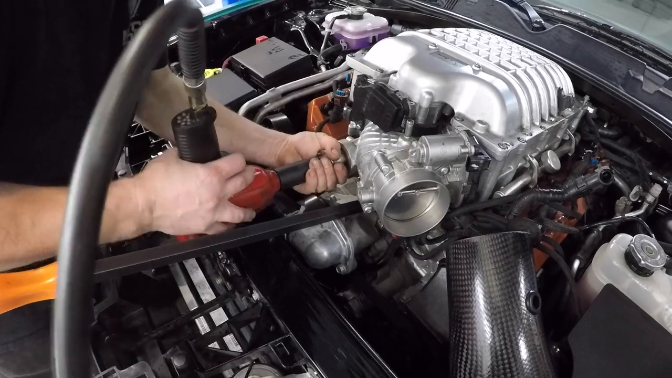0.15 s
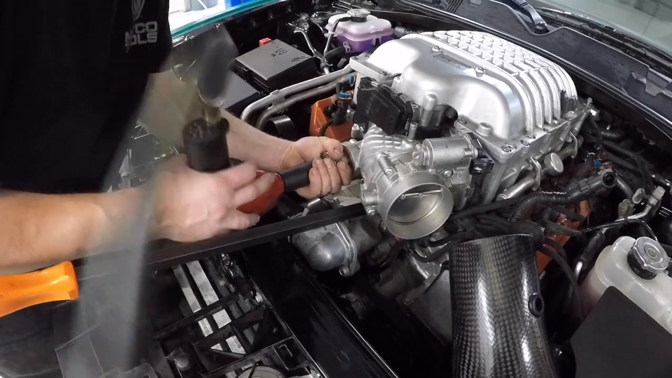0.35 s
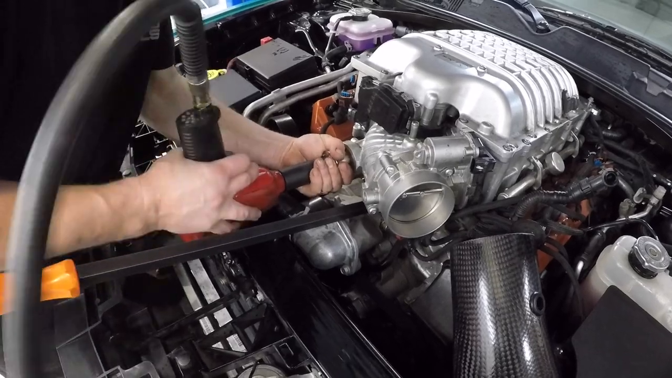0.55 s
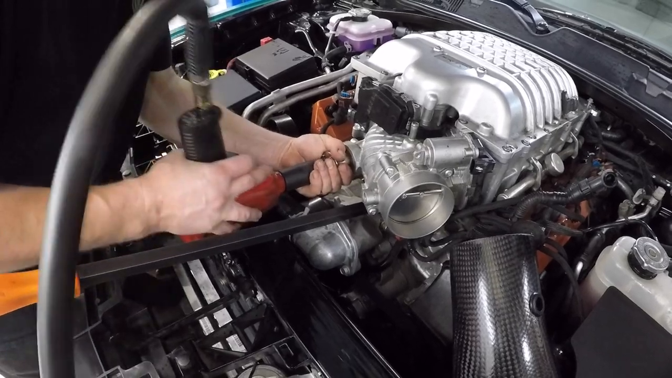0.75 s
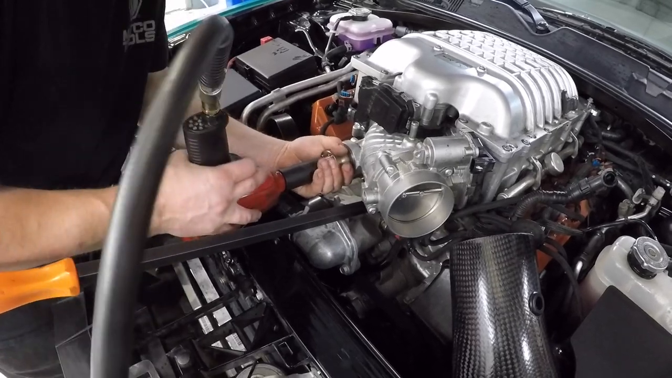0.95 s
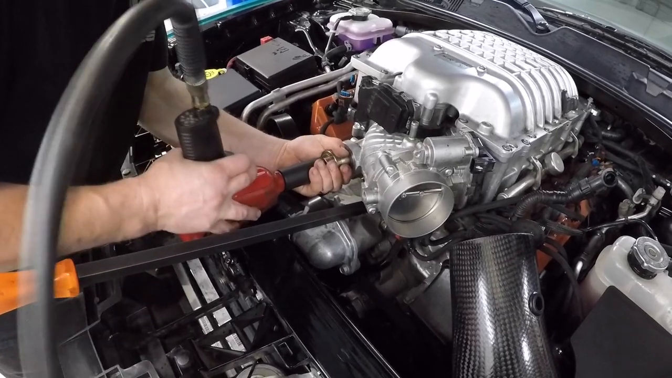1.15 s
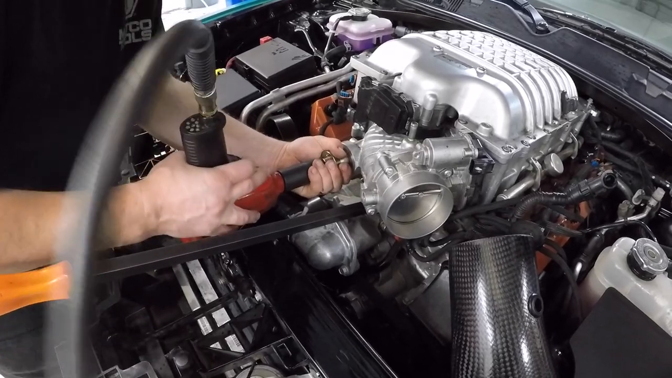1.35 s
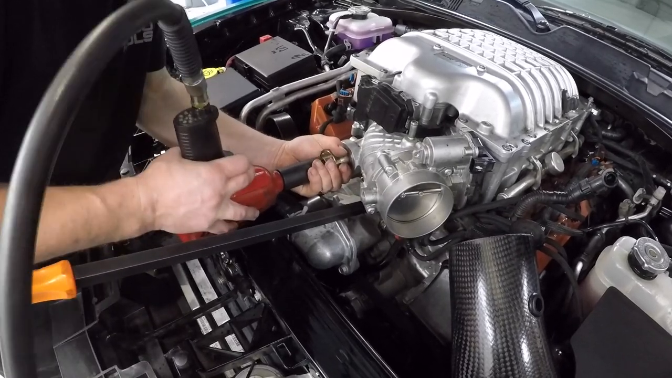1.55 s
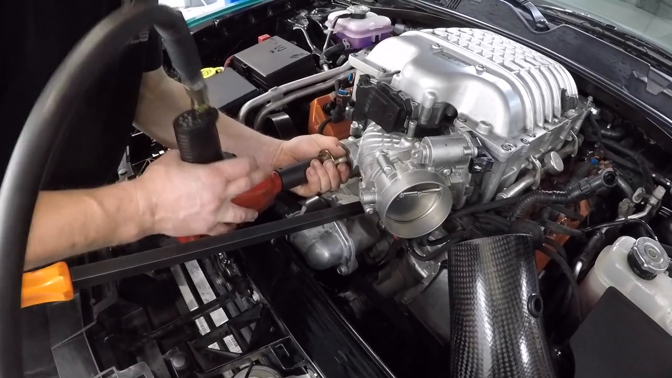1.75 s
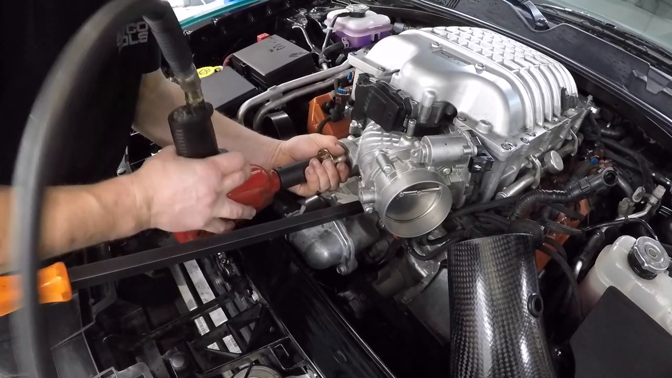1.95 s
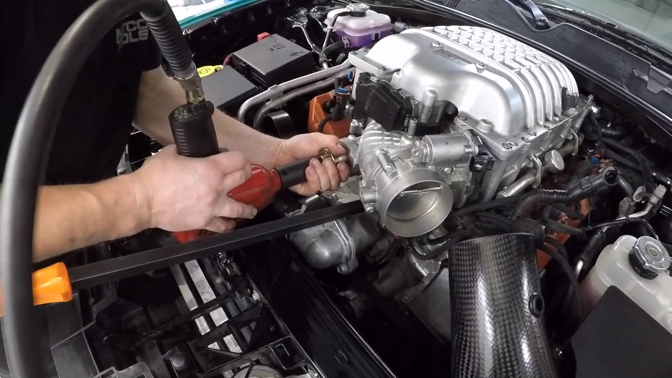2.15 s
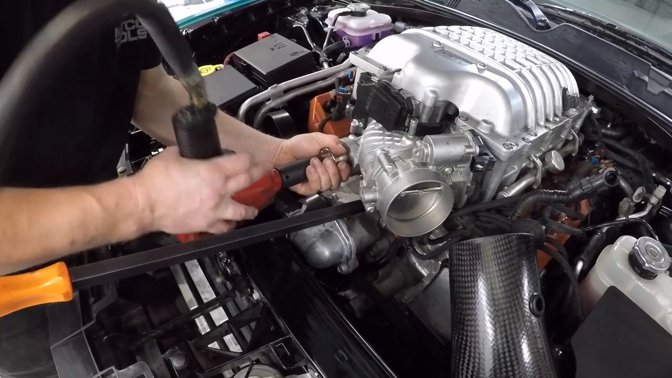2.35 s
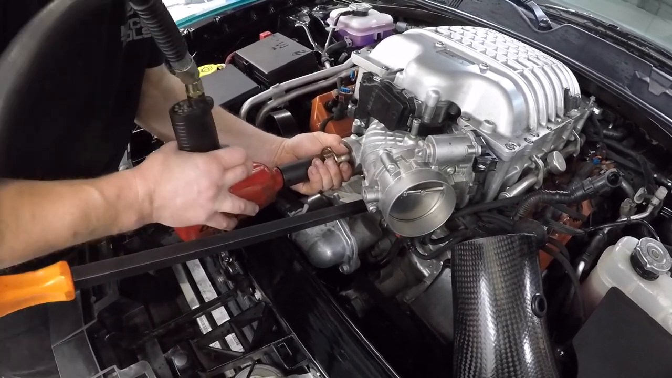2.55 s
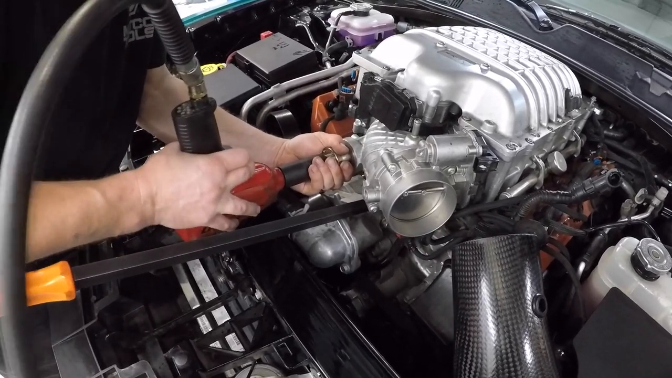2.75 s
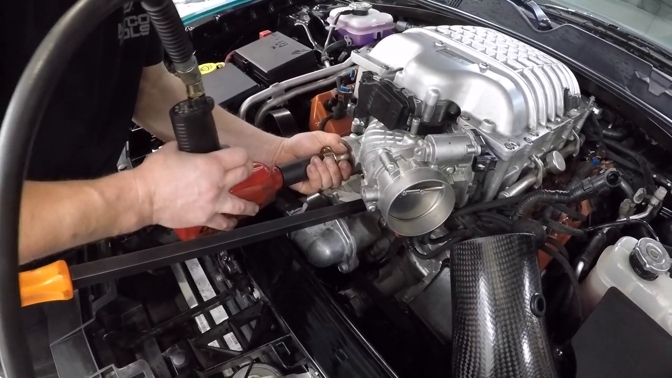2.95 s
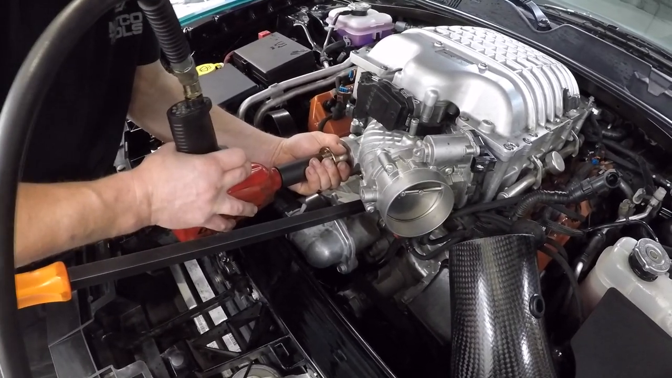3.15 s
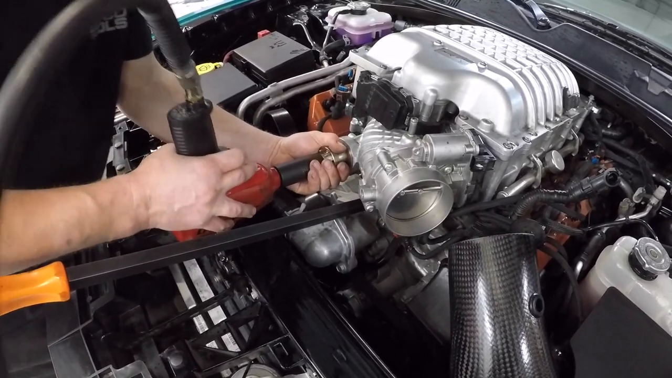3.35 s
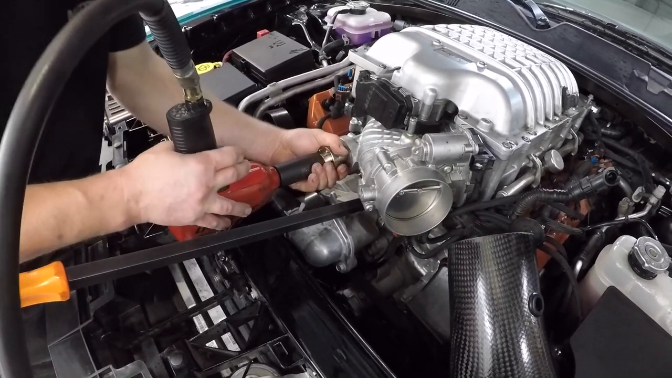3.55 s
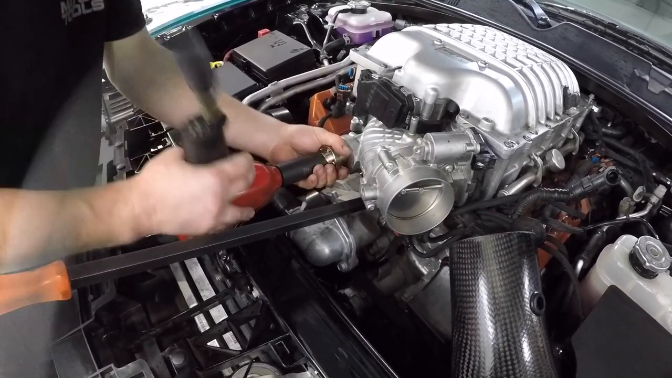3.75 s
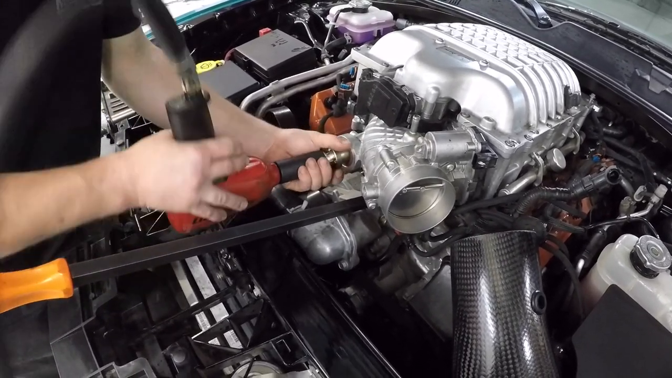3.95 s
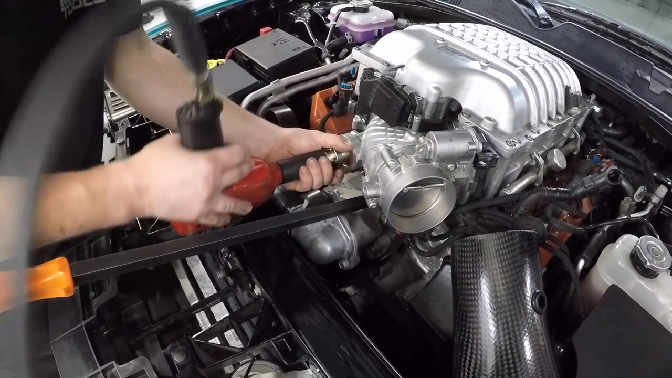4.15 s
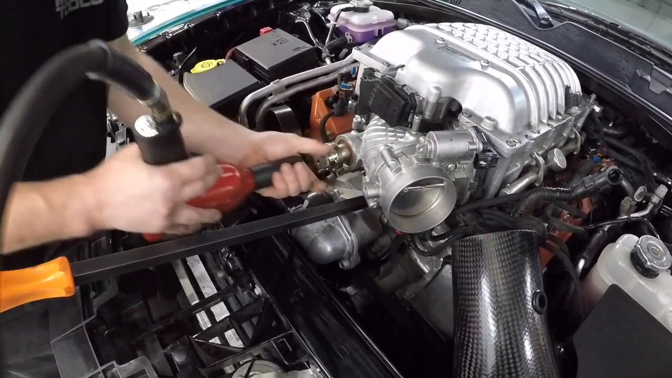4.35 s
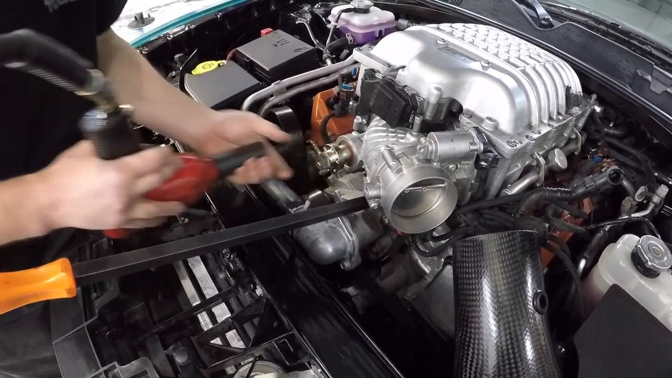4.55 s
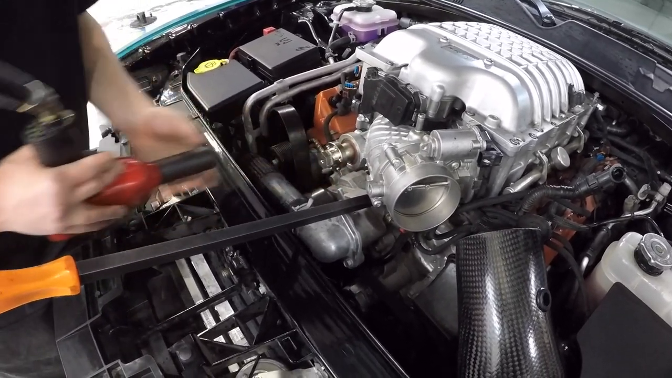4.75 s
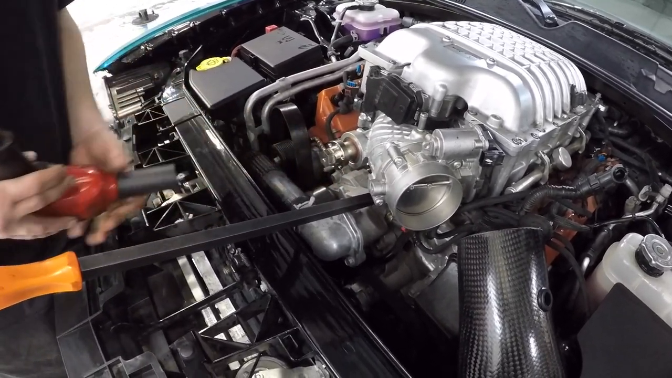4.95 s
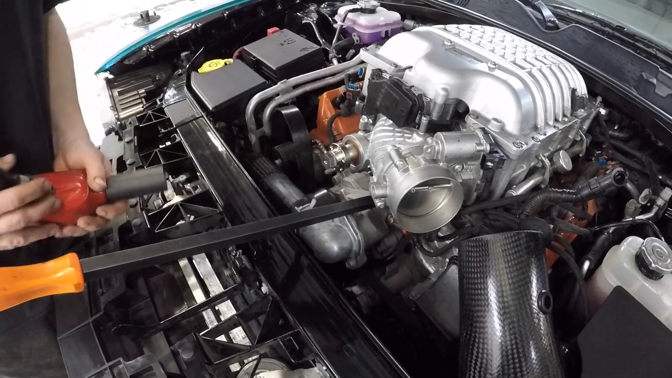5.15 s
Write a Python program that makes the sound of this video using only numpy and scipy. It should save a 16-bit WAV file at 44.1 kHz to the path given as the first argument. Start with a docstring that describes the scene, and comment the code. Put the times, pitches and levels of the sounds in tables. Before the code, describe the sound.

A nearby stereo microphone catches a pneumatic wrench tightening a bolt: loud buzzing rattles of about twenty blows a second, bright steel clank and breathy air exhaust. Five short bursts and one longer one echo in a large hard-walled garage. Afterwards the tail fades, ventilation drone and a thin steady tone rise, with soft thuds and ticks as the tool is moved away.

```python
"""Impact wrench in a garage

An air impact wrench hammers a bolt in six bursts inside an engine bay, in a large echoing garage.
Vane pulses, exhaust pops and jet noise make the motor; each blow rings the modes of anvil, socket and bolt
and shakes loose parts. Decaying noise makes the echo, and noise and wavering tones make the shop.
When the tool stops, the echo dies and the recorder's gain control slowly lifts the hum of the shop,
with a few small knocks and clinks of handling."""
import sys
import numpy as np
from scipy import signal
from scipy.fft import rfft, irfft
from scipy.io import wavfile
from scipy.ndimage import uniform_filter1d

SR = 44100
rng = np.random.default_rng(int(sys.argv[2]) if len(sys.argv) > 2 else 0)


def gain_from_decibels(decibels):
    """Convert decibel values to linear amplitude factors."""
    exponent = np.asarray(decibels, float) / 20
    return 10 ** exponent


def materialize(psi):
    """Save the field psi as 16-bit PCM at rate SR to the path in sys.argv[1].

    A 1-D psi becomes a single channel; in a 2-D psi each row is a channel.
    """
    bounded = np.clip(np.atleast_2d(psi).T, -1, 1)
    quanta = np.round(bounded * 32767).astype(np.int16)
    wavfile.write(sys.argv[1], SR, quanta)


N = 233730
TIME = np.arange(N) / SR   # seconds


def rms_one(x):
    """Scale to rms 1."""
    return x / np.sqrt(np.mean(x ** 2) + 1e-20)


def at_hz(points, hz, column=1):
    """Read a table on a log-frequency axis."""
    points = np.array(points)
    return np.interp(np.log(hz), np.log(points[:, 0]), points[:, column])


def band(x, low_hz, high_hz):
    """Keep the sound between two frequencies (Butterworth band-pass)."""
    edges = [low_hz, min(high_hz, .45 * SR)]
    return signal.sosfilt(signal.butter(2, edges, "band", fs=SR, output="sos"), x)


def clicks(times, sizes):
    """Single-sample clicks of the given sizes at the given times in seconds."""
    out = np.full(N, 1e-18)
    places = np.clip((np.asarray(times) * SR).astype(int), 0, N - 1)
    np.add.at(out, places, sizes)
    return out


def dying(x, t60):
    """Every click leaves an exponential tail that falls 60 dB in t60 seconds."""
    return signal.lfilter([1], [1, -gain_from_decibels(-60 / (t60 * SR))], x)


def coloured(spectrum, likeness):
    """Stereo noise with a spectrum and a left-right likeness by frequency; rms 1."""
    hz = np.maximum(np.arange(N // 2 + 1) * SR / N, 1)
    alike = np.clip(at_hz(likeness, hz), -1, 1)
    mid, side = rfft(rng.standard_normal((2, N))) * gain_from_decibels(at_hz(spectrum, hz))
    left_right = np.sqrt(1 + alike) * mid + np.sqrt(1 - alike) * side * [[1], [-1]]
    return rms_one(irfft(left_right, N))


# Pulls of the trigger. Each row: valve opens in seconds, valve starts to shut in seconds,
# air pressure in dB, pop pitch in Hz before scatter.
TRIGGER = [(-.003, 0.196, 4, 152), (0.382, 0.692, 0, 160), (0.937, 1.225, 0, 139), (1.387, 1.681, -.5, 110),
           (1.86, 2.273, -0.5, 122), (2.418, 3.241, -1, 149.5)]


def burst_of(s):
    """Index of the trigger pull that each moment belongs to."""
    return np.maximum(np.searchsorted(np.array(TRIGGER)[:, 0], s) - 1, 0)


# Motor start before the first blow of a pull. Each row: lead before the blow in ms for the usual start time,
# gust of the jet in dB, width of the gust in ms, pop in dB before air pressure.
SPIN_UP = [(46, -30, 1.8, -35), (35.9, -17, 3.7, -18.5), (21.15, -20, 2.7, -14.5), (11.1, -18, 3.5, -15.5)]
SPIN_UP_S = .04   # usual start time; a slower start stretches the pattern
POP_PER_PRESSURE = 1.3   # dB of pop per dB of air pressure


def spin_up():
    """Rows (s, gust dB, width ms, pop dB, pop Hz) leading from each opening of the valve to the first blow."""
    s = np.array(BLOWS)[:, 0]
    rows = []
    for opens, _, pressure_db, hz in TRIGGER:
        first = s[s > opens][0]
        stretch = (first - opens) / SPIN_UP_S
        for ms, gust_db, width_ms, pop_db in SPIN_UP:
            at = first - ms / 1000 * stretch
            rows.append((at, gust_db, width_ms, pop_db + POP_PER_PRESSURE * pressure_db, hz))
    return rows


POWERED_GAP_S = .06   # blows closer than this follow under air
STALL_S, STALL_SCATTER_S = 0.0258, .002   # the motor stands still after a blow, then restarts with a pop
POP_DB, POP_SAG_DB_PER_S, POP_SCATTER_DB = -11.5, 6, 0.76
POP_PITCH_SCATTER = 0.1   # spread of the natural log of the pitch
VENT_S, VENT_DB, VENT_HZ = .012, -20.5, 178   # a faint pop after the last blow of a burst


def pop_events():
    """Rows (s, dB, Hz): restarts after blows, weaker as the air sags; venting at the end; spin-up pops."""
    s = np.array(BLOWS)[:, 0]
    opens, _, pressure_db, hz = np.array(TRIGGER)[burst_of(s)].T
    luck = rng.standard_normal((len(s), 3))
    close = np.diff(s) < POWERED_GAP_S
    followed = np.append(close, False)
    last = np.append(False, close) & ~followed
    at = s + STALL_S + STALL_SCATTER_S * luck[:, 0]
    db = POP_DB + POP_PER_PRESSURE * pressure_db - POP_SAG_DB_PER_S * (s - opens)
    db = db + POP_SCATTER_DB * luck[:, 1]
    restarts = np.transpose([at, db, hz * np.exp(POP_PITCH_SCATTER * luck[:, 2])])
    vents = [(blow + VENT_S, VENT_DB, VENT_HZ) for blow in s[last]]
    starts = [(start, start_db, pitch) for start, _, _, start_db, pitch in spin_up()]
    return [*restarts[followed], *vents, *starts]


def pops(turns_before=0.49, turns_after=0.67, puff_s=0.0033):
    """A small crest, a deep trough and a larger second crest of pressure; the first carries a puff of jet noise."""
    wave, puff = np.zeros(N), np.zeros(N)
    for s, db, hz in pop_events():
        near = slice(max(int((s - .025) * SR), 0), max(int((s + .025) * SR), 0))
        turn = (TIME[near] - s) * hz   # cycles from the trough
        fade = np.exp(-(turn / np.where(turn < 0, turns_before, turns_after)) ** 2)
        wave[near] -= gain_from_decibels(db) * np.cos(2 * np.pi * turn) * fade
        puff[near] += gain_from_decibels(db) * np.exp(-((turn + .5) / (hz * puff_s)) ** 2)
    return wave, puff


# Vane motor around each blow, speeding up to it and braked by it.
# Each row: time from the blow in ms, vane pulses in Hz, pulse level in dB.
SPIN = [(-21, 190, -13.5), (-15, 280, -1), (-8, 330, -2.5), (0, 370, -9.5), (8, 260, -8), (17, 200, -6)]
# Overtones of the vane pulses. Each row: multiple of the pulse rate, level in dB, phase in radians.
VANE_OVERTONES = [(1, 0, .0), (2, -10.5, 0.74), (3, -18.5, 0.21), (4, -16, 0.3)]
# Colour of the exhaust jet. Each row: frequency in Hz, relative level in dB per Hz.
HISS = [(260, 0), (450, -10), (790, -13), (1050, -8.5), (1980, -5), (2780, -14.5), (3580, -7), (4960, -7.5),
        (6660, -2), (10200, -22), (11200, -28), (12200, -26), (15500, -38)]
# How alike the tool's noise is in the two ears. Each row: frequency in Hz, likeness from -1 to 1.
LIKENESS = [(60, 1), (120, 0.92), (240, 0.98), (480, 0.58), (950, 0.28), (1890, -0.19), (3770, 0.84),
            (7520, -0.33), (15000, -0.14)]
# Low notes of the exhaust lean left. Each row: frequency in Hz, left over right in dB.
LEFT_DB = [(30, 6.5), (125, 2.6), (400, -.1)]
VANE_DB, HISS_DB = -21, -25
HISS_PER_PRESSURE = 0.24   # dB of hiss per dB of air pressure
GUST_LEAD_S = 0.0027   # the gust comes ahead of its pop


def air_motor(jet_depth=0.24, pop_jet_db=-12, rough=0.24, rumble_db=-36):
    """Vanes pulse the exhaust ever faster up to each blow; the jet hisses on each pulse."""
    marks = sorted((s + ms / 1000, hz, db) for s, *_ in BLOWS for ms, hz, db in SPIN)
    at, vane_hz, vane_db = np.transpose(marks)
    turn = 2 * np.pi * np.cumsum(np.interp(TIME, at, vane_hz)) / SR
    uneven = np.exp(rough * rms_one(band(rng.standard_normal(N), 30, 142)))
    flow, jet, size = np.zeros(N), np.zeros(N), np.zeros(N)
    for opens, shuts, pressure_db, _ in TRIGGER:
        opening = np.clip((TIME - opens) / 0.0056, 0, 1)
        valve = opening * np.exp(-np.maximum(TIME - shuts, 0) / 0.017)
        flow += valve
        size += gain_from_decibels(VANE_DB + pressure_db) * valve
        jet += gain_from_decibels(HISS_DB + HISS_PER_PRESSURE * pressure_db) * valve
    for s, db, ms, *_ in spin_up():
        jet += gain_from_decibels(db) * np.exp(-np.abs(TIME - s + GUST_LEAD_S) * 1000 / ms)
    size = size * uneven * gain_from_decibels(np.interp(TIME, at, vane_db))
    pulses = size * sum(gain_from_decibels(db) * np.cos(k * turn + lag) for k, db, lag in VANE_OVERTONES)
    rumble = flow * gain_from_decibels(rumble_db) * rms_one(band(rng.standard_normal(N), 58, 134))
    pop, puff = pops()
    hz = np.maximum(np.arange(N // 2 + 1) * SR / N, 1)
    lean = gain_from_decibels(at_hz(LEFT_DB, hz) * [[.5], [-.5]])
    low = irfft(rfft(pop + pulses + rumble) * lean, N)
    gate = jet * (1 + jet_depth * np.cos(turn)) + gain_from_decibels(pop_jet_db) * puff
    return low + gate * coloured(HISS, LIKENESS)


# Colour of ventilation and distant machines. Each row: frequency in Hz, relative level in dB per Hz.
SHOP = [(15, -42), (25, 1), (140, 2), (204, -10), (281, -15.5), (537, -7.5), (582, -22), (741, -11),
        (848, -8.5), (1530, -10), (5580, -17.5), (8350, -33.5), (13500, -49), (15500, -80)]
# How alike the shop's noise is in the two ears. Each row: frequency in Hz, likeness from -1 to 1.
SHOP_LIKENESS = [(60, 0.95), (180, 0.4), (550, -0.69), (1650, -0.088), (4970, 0.21), (15000, -0.79)]
# The shop's noise swells. Each row: time in seconds, change of level in dB.
RUMBLE = [(0, -3), (3.8, -1.5), (4.4, 1.5), (4.8, 3.5), (5.3, 4.5)]
# Steady tones of shop machines. Each row: start in seconds, stop in seconds, pitch in Hz,
# width of the line in Hz, rms level in dB.
TONES = [(0, 3.9, 587.5, 1, -60), (3.78, 6, 587.5, 1, -53), (4.5, 6, 861, 12, -65),
         (4.62, 5.12, 5520, 150, -57.5)]
SHOP_DB, DRONE_DB, DRONE_STARTS_S = -47.5, -52.5, 3.72   # the drone is weaker until it starts in full
# a low rumble fades, then follows the shop's swell by half
LOW_RUMBLE_DB, LOW_FADE_DB_PER_S, LOW_STEADY_DB = -43, 1.5, -52


def shop():
    """Broad machine noise, a lumpy drone, a low rumble and a few wavering tones."""
    swell = gain_from_decibels(np.interp(TIME, *np.transpose(RUMBLE)))
    out = gain_from_decibels(SHOP_DB) * swell * coloured(SHOP, SHOP_LIKENESS)
    lumps = np.exp(.2 * rms_one(band(rng.standard_normal(N), 4, 20)))
    drone_on = np.clip((TIME - DRONE_STARTS_S) / 0.24, .4, 1)
    drone = rms_one(band(rng.standard_normal(N), 172, 211))
    out += gain_from_decibels(DRONE_DB) * swell * drone_on * lumps * drone
    fading = gain_from_decibels(LOW_RUMBLE_DB - LOW_FADE_DB_PER_S * TIME)
    steady = gain_from_decibels(LOW_STEADY_DB) * np.sqrt(swell)
    out += np.maximum(fading, steady) * rms_one(band(rng.standard_normal(N), 55, 426))
    for starts, stops, hz, width_hz, db in TONES:
        on = np.clip((TIME - starts) / 0.23, 0, 1) * np.clip((stops - TIME) / .08, 0, 1)
        # a random walk of phase widens the line
        wobble = np.cumsum(rng.standard_normal(N)) * np.sqrt(2 * np.pi * width_hz / SR)
        out += gain_from_decibels(db) * np.sqrt(2) * on * np.sin(2 * np.pi * hz * TIME + wobble)
    return out


# Echo of the garage. Each row: frequency in Hz, relative level in dB, time to fall 60 dB in seconds.
GARAGE = [(101, -4, 0.94), (297, -2, 0.98), (725, 4, 1.9), (946, 7, 3.5), (1200, -2, 1.6),
          (1604, 8.5, 3.66), (2060, 1.5, 2), (2490, 4, 3.2), (3220, -2, 1.84), (5040, -0.5, 1.88),
          (8240, -7.5, 1.0)]


def garage(x, wet_db=-13, gap_s=0.013):
    """Diffuse echo: third-octave bands of noise, own in each ear, each dying at its own rate."""
    t = TIME[:2 * SR]
    tail = 0
    for hz in 90 * 2 ** np.arange(0, 7.2, 1 / 3):
        decay = gain_from_decibels(at_hz(GARAGE, hz) - 60 * t / at_hz(GARAGE, hz, column=2))
        noise = rng.standard_normal((2, len(t)))
        tail = tail + decay * band(noise, hz / 2 ** (1 / 6), hz * 2 ** (1 / 6))
    # a hollow resonance of the engine bay
    hollow = band(rng.standard_normal((2, len(t))), 976, 1083)
    tail = tail + gain_from_decibels(7.5 - 60 * t / 2.8) * hollow
    # silent for gap_s, then fading in over as long again
    tail = tail * np.clip(t / gap_s - 1, 0, 1) * gain_from_decibels(wet_db) / np.sqrt(.1 * SR)
    return signal.fftconvolve(x, tail, axes=1)[:, :N]


# Hammer on anvil, with stray blows as the motor coasts. Each row: time in seconds, strength in dB.
BLOWS = [(0.0372, -6), (0.0878, -6), (0.131, -5.5), (0.173, -5.5), (0.218, -3.5), (0.317, -11.5),
         (0.4202, -2.5), (0.4649, -2.5), (0.5108, -2.5), (0.555, -3), (0.6, -4), (0.6444, -4.5),
         (0.6931, -3.5), (0.9813, -3), (1.0297, -3), (1.078, -3), (1.1266, -4.5), (1.1751, -5),
         (1.2254, -3), (1.4271, -3), (1.477, -3.5), (1.5287, -4), (1.5777, -3.5), (1.6271, -3.5),
         (1.6769, -4.5), (1.8976, -2.5), (1.951, -4), (2.0005, -2.5), (2.049, -5.5), (2.0955, -3),
         (2.144, -5), (2.1936, -5.5), (2.2418, -5), (2.307, -5.5), (2.4548, -5), (2.5035, -3.5),
         (2.5518, -5.5), (2.601, -4), (2.6477, -4), (2.6964, -6), (2.7433, -4), (2.7926, -3.5),
         (2.8423, -4), (2.8918, -5.5), (2.9419, -6), (2.9901, -5), (3.037, -6), (3.0877, -6.5),
         (3.1355, -4.5), (3.1828, -3.5), (3.236, -4.5), (3.3043, -22.5), (3.3725, -19)]
# The loose socket touches the bolt, without bouncing. Each row: time in seconds, strength in dB.
CLINKS = [(4.152, -28), (4.186, -33)]
# Contacts within one blow. Each row: delay after the blow in ms, dB into low modes, dB into high modes.
CONTACTS = [(0, -11, -3), (2.0, -12.5, -4), (5.0, -1, -15.5), (10.8, -11.5, -25)]
# Ringing modes of anvil, socket and bolt. Each row: pitch in Hz before detuning, level in dB,
# time to fall 60 dB in seconds, left over right in dB, lead of the left ear in radians.
STEEL = [(849, -29, 0.098, 5, 0.46), (956, -21, 0.083, -9.5, 3.13), (1365, -18, 0.036, 1.5, 1.67),
         (1459, -9.5, 0.016, 1, 1.2), (1620, -15, 0.066, 6.5, 3.65), (2054, -7, 0.032, -1, 1.44),
         (2457, -16.5, 0.12, 0.5, 2.47), (3630, -43, 0.038, 15, .1), (4200, -13, 0.029, 2.5, 0.56),
         (4460, -16, 0.04, -14.5, 0.44), (5232, -11, 0.038, -6, 1.3), (5846, -16, 0.025, 22.5, 1.8),
         (6320, -27.5, 0.04, 30, 0.68)]
# The unloaded socket rings on after the last blow of a burst or a stray one.
# Each row: start in seconds, pitch in Hz, level in dB, time to fall 60 dB in seconds.
FREE_RINGS = [(.217, 6200, -33, 0.42), (.317, 6700, -33, 0.16), (.693, 6040, -36, 0.43),
              (1.226, 5900, -41, .25), (1.677, 6220, -39, 0.19), (2.307, 6430, -19.5, 0.15),
              (3.236, 6500, -40, .2)]
# Loose parts shaken by a blow. Each row: frequency in Hz, relative level in dB per Hz.
RATTLE = [(290, -39), (500, -35), (968, -15.5), (1770, -18), (2010, -15), (3190, -17.5), (4380, -16),
          (6000, -16.5), (9240, -29.5), (11100, -47), (13400, -65), (15500, -60)]
LOW_MODES_DB, HIGH_MODES_DB, SEATING_DB = -1.64, -1.5, 1.5   # base of both groups, scatter per blow
HIGH_PER_PRESSURE = 0.91   # dB of high modes per dB of air pressure
CLINK_HIGH_DB = -15   # a light touch reaches the high modes and the loose parts less
# low and high modes grow through a burst as the bolt seats
TIGHTEN_DB_PER_S, TIGHTEN_HIGH_DB_PER_S = 3, 2


def blows(split_hz=2800, spread_db=2.0, rattle_db=-13, rattle_t60=0.09, grain=0.31):
    """Each blow lands and bounces three times into the steel modes, and shakes loose parts into a rattle."""
    s, peak_db = np.transpose(BLOWS + CLINKS)
    hammered = np.arange(len(s)) < len(BLOWS)
    touch_db = CLINK_HIGH_DB * ~hammered
    pull = np.array(TRIGGER)[burst_of(s)]
    seated = np.minimum(s - pull[:, 0], 1)
    scatter = SEATING_DB * rng.standard_normal((len(s), 2))
    body_db, clank_db = (scatter + [LOW_MODES_DB, HIGH_MODES_DB]).T
    body_db = body_db + TIGHTEN_DB_PER_S * seated
    clank_db = clank_db + touch_db + TIGHTEN_HIGH_DB_PER_S * seated + HIGH_PER_PRESSURE * pull[:, 2]
    # bounces, but not the first contact, vary a little in time (seconds)
    slip = rng.normal(0, .0004, (len(s), len(CONTACTS))) * (np.arange(len(CONTACTS)) > 0)
    chance = rng.normal(0, spread_db, (len(s), len(STEEL), len(CONTACTS)))
    # the socket sits a little differently each time
    loose = np.where(np.array(STEEL)[:, 0] < split_hz, .008, .022)
    detune = rng.normal(0, loose, (len(s), len(STEEL)))
    latest = np.maximum(np.searchsorted(s, TIME) - 1, 0)
    out = np.zeros((2, N))
    for k, (hz, level_db, t60, pan_db, lead) in enumerate(STEEL):
        train = 0
        for j, (ms, low_db, high_db) in enumerate(CONTACTS):
            group_db = low_db + body_db if hz < split_hz else high_db + clank_db
            times = s + (ms / 1000 + slip[:, j]) * hammered
            train = train + clicks(times, gain_from_decibels(peak_db + level_db + chance[:, k, j] + group_db))
        # a turning, shrinking arrow: one decaying mode
        pole = gain_from_decibels(-60 / (t60 * SR)) * np.exp(2j * np.pi * hz / SR)
        ring = signal.lfilter([1], [1, -pole], train)
        ring = ring * np.exp(2j * np.pi * hz * detune[latest, k] * (TIME - s[latest]))
        ears = np.imag(ring * np.exp([[.5j * lead], [-.5j * lead]]))
        out += ears * gain_from_decibels([[pan_db / 2], [-pan_db / 2]])
    for at, hz, db, t60 in FREE_RINGS:
        out += dying(clicks([at], gain_from_decibels(db)), t60) * np.sin(2 * np.pi * hz * TIME + [[.6], [-.6]])
    # contacts last some tens of microseconds, which softens the treble
    out = signal.sosfilt(signal.butter(4, 8000, fs=SR, output="sos"), out)
    shake = dying(clicks(s, gain_from_decibels(peak_db + rattle_db + touch_db)), rattle_t60)
    # parts chatter unevenly
    shake = shake * np.exp(grain * rms_one(band(rng.standard_normal(N), 38, 260)))
    return out, uniform_filter1d(shake, size=60) * coloured(RATTLE, LIKENESS)


# Thuds and ticks of hands, hose and tool body.
# Each row: start in seconds, level in dB, low edge in Hz, high edge in Hz.
HANDLING = [(3.8, -41, 80, 450), (3.812, -37, 80, 450), (4.158, -38, 550, 2300), (4.605, -44, 900, 1600),
            (5.075, -53, 2000, 7000), (5.137, -43, 1500, 3500), (5.137, -63, 8000, 14000)]
KNOCK_T60_S = .14


def handling():
    """Small knocks and clinks: short dying noise in a band."""
    out = np.zeros((2, N))
    for s, db, low_hz, high_hz in HANDLING:
        # one noise shared by both ears plus one for each
        noise = rng.standard_normal(N) + rng.standard_normal((2, N))
        # filtered twice for steeper edges
        noise = rms_one(band(band(noise, low_hz, high_hz), low_hz, high_hz))
        knock = dying(clicks([s], gain_from_decibels(db)), KNOCK_T60_S)
        out += uniform_filter1d(knock, size=60) * noise
    return out


def scene():
    """Tool, hands and shop, with the garage echo; steel deep in the engine bay reaches the walls weakly."""
    rings, rattle = blows()
    air = air_motor()
    echo = garage(gain_from_decibels(-14) * rings + rattle + air)
    return rings + rattle + air + echo + handling() + shop()


def roll_off(x):
    """The treble ends steeply here."""
    return signal.sosfilt(signal.butter(12, 15730, fs=SR, output="sos"), x)


MIC_LOW_CUT_HZ = 29
OVERLOAD = 1.6   # level at which the input rounds off


def record(dry):
    """Gain control: after the sound has stayed quiet for a while the gain creeps up; peaks are rounded."""
    loud_db, hold_s, rise_db_per_s = -30, .45, 8.5
    level = np.sqrt(uniform_filter1d(np.mean(dry ** 2, axis=0), size=1024))
    last_loud = np.maximum.accumulate(np.where(level > gain_from_decibels(loud_db), TIME, 0))
    gain_db = rise_db_per_s * np.maximum(TIME - last_loud - hold_s, 0)
    low_cut = signal.butter(2, MIC_LOW_CUT_HZ, "high", fs=SR, output="sos")
    top_cut = signal.cheby2(10, 40, 16000, fs=SR, output="sos")
    lifted = signal.sosfilt(low_cut, dry) * gain_from_decibels(gain_db)
    rounded = OVERLOAD * np.tanh(lifted / OVERLOAD)
    return roll_off(signal.sosfilt(top_cut, rounded))


dry = scene()
out = record(dry)
materialize(out)
```